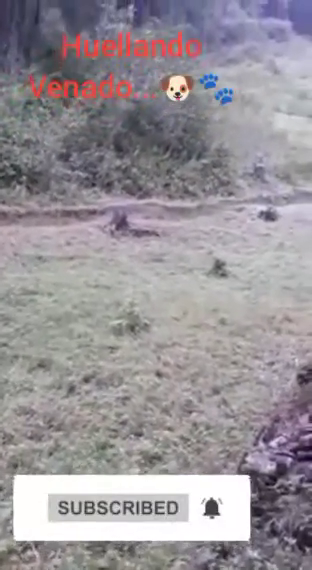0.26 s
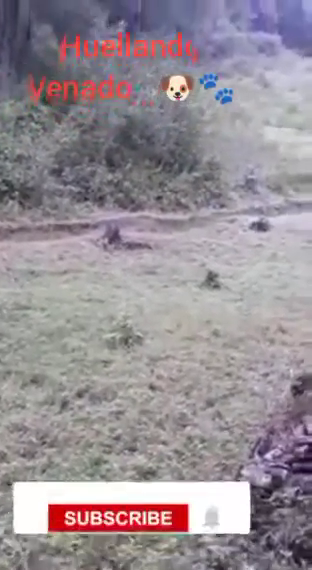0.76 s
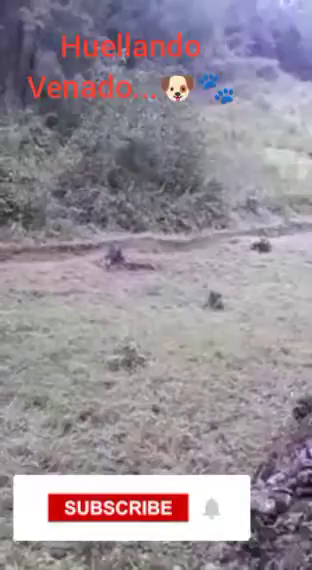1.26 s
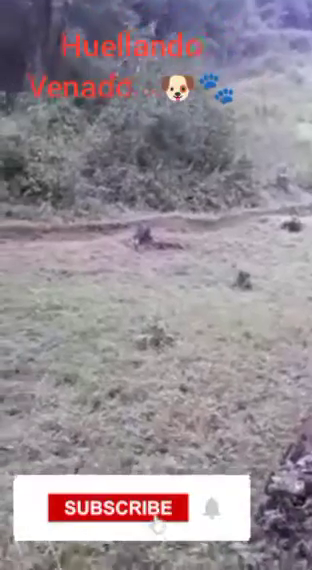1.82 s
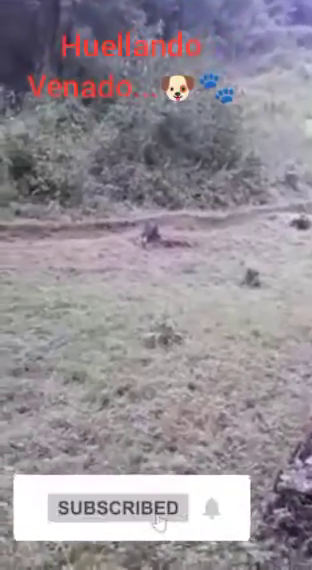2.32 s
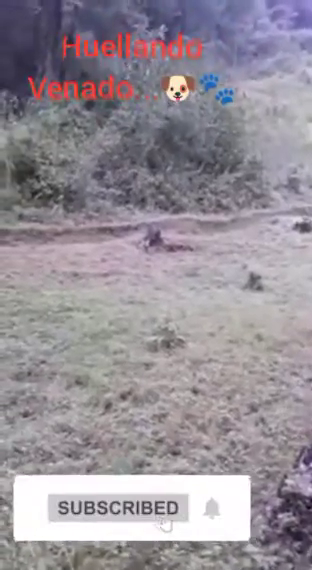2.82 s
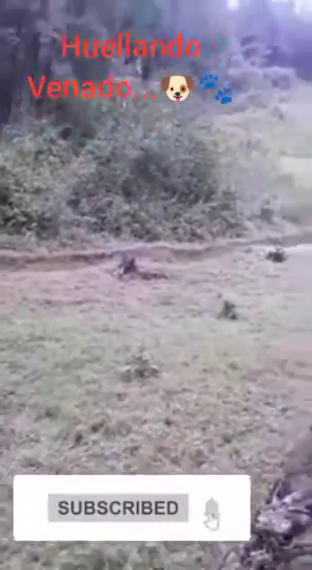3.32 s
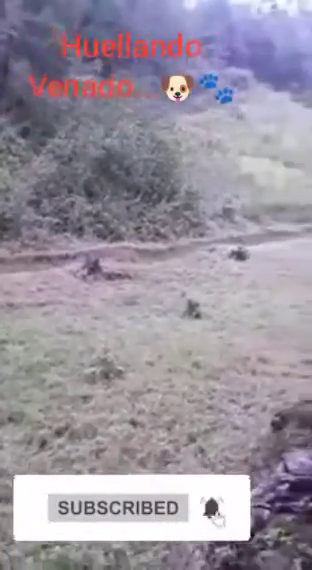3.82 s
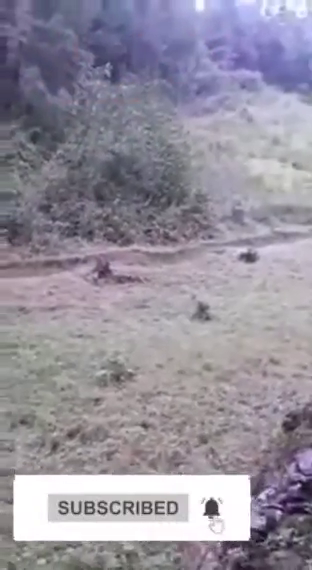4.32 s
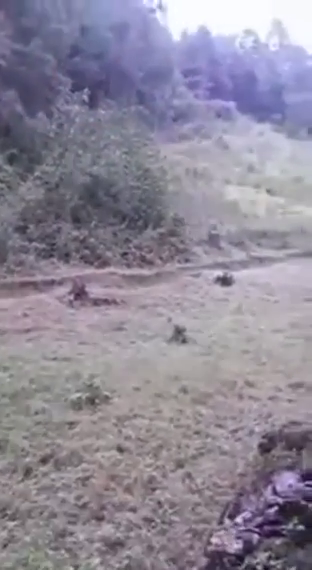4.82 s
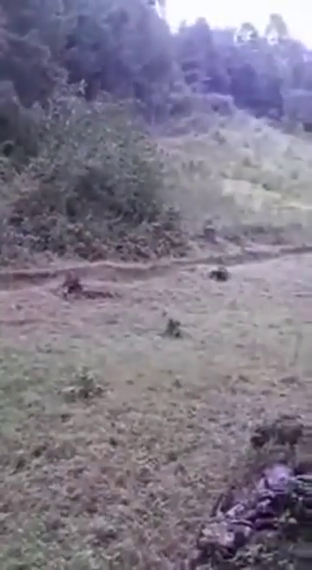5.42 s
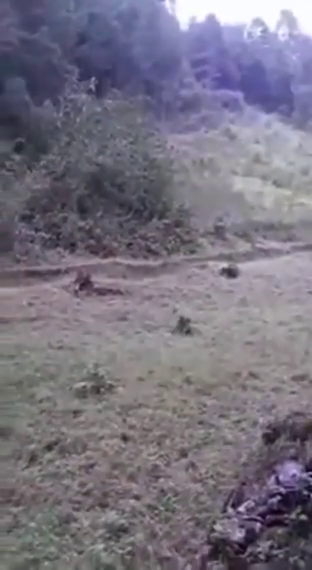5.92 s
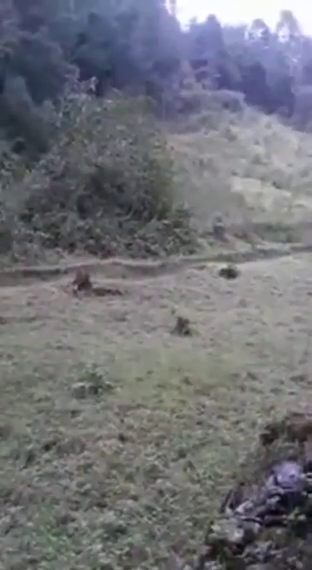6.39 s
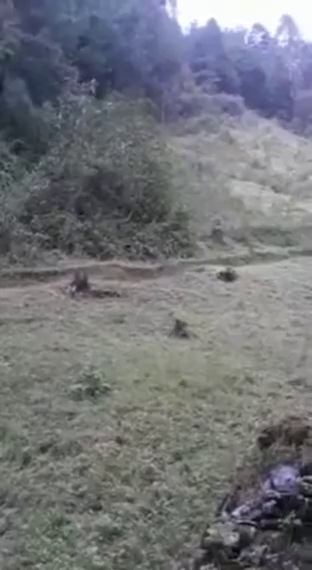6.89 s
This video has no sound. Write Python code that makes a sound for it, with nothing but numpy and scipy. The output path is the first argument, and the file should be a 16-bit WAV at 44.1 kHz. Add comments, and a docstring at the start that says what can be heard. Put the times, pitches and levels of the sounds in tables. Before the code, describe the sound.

Across a wooded valley, a hound bays repeatedly, each yip breaking into a short, hoarse held note that rings off the slopes. A higher second dog answers now and then and yelps once, while a pack barks faintly far behind. Nearer and to the left, a bird repeats a chip and buzzy trill, and others whistle thinly. Faint insects, hillside hiss and light wind on the microphone lie underneath.

```python
"""Hounds across a wooded valley

Across the valley a lead hound bays, a yip breaking to a hoarse held note, with a higher second voice
and one yelp, all ringing off the slopes; a pack barks beyond the ridge. Nearer and to the left, a bird
repeats a chip and a buzzy trill, and others whistle thinly. Insects and the hillside hiss, light wind
rumbles on the stereo microphone, and there is one soft click."""
import sys
import numpy as np
from scipy import signal
from scipy.fft import rfft, irfft, next_fast_len
from scipy.io import wavfile
from scipy.ndimage import uniform_filter1d, map_coordinates

SR = 44100
rng = np.random.default_rng(int(sys.argv[2]) if len(sys.argv) > 2 else 0)


def master(y):
    """Save y as 16-bit WAV."""
    cut = np.clip(np.atleast_2d(y).T, -1, 1)
    pcm = np.round(cut * 32767)  # scale
    wavfile.write(sys.argv[1], SR, pcm.astype(np.int16))


N = 315315
TIME_S = np.arange(N) / SR


def amp(db):
    return 10 ** (np.asarray(db) / 20)


def unit(x):
    return x / np.sqrt(np.mean(x ** 2) + 1e-20)


def along(points, hz):
    """(frequency_hz, value) points joined on a log axis."""
    f, v = np.transpose(points)
    return np.interp(np.log(hz + 1), np.log(f + 1), v)


def curve(points):
    """(time_s, value) points joined, one value a sample."""
    return np.interp(TIME_S, *np.transpose(points))


def wobble(rate):
    """A smooth random curve, rate knots a second."""
    return map_coordinates(rng.standard_normal(int(N * rate / SR) + 4), [TIME_S * rate])


def filtered(x, response):
    """x times a complex response of frequency."""
    size = next_fast_len(N + SR // 2)
    return irfft(rfft(x, size) * response(np.fft.rfftfreq(size, 1 / SR)), size)[..., :N]


def resonance(hz, centre, width):
    """Response of two like band-passes in series."""
    return (1j * hz * width / (centre ** 2 - hz ** 2 + 1j * hz * width)) ** 2


def phrase(calls):
    """Phase and a gain per level from rows of time_s, pitch_hz, level_db...; silent between calls."""
    times, hz, *levels = np.vstack(calls).T
    sounding = sum((TIME_S >= call[0][0]) & (TIME_S < call[-1][0]) for call in calls) > 0
    gate = uniform_filter1d(sounding * 1., size=160)
    phase = 2 * np.pi * np.cumsum(np.interp(TIME_S, times, hz)) / SR
    return phase, [np.sqrt(2) * gate * amp(np.interp(TIME_S, times, db)) for db in levels]


def rush(spectrum, patchy_db):
    """Coloured noise, unrelated left and right, with patches of random gain."""
    cells = signal.stft(rng.standard_normal((2, N)), nperseg=512)[2]
    patches = uniform_filter1d(uniform_filter1d(rng.standard_normal(cells.shape[1:]), 6, 0), 14, 1)
    pair = signal.istft(cells * amp(patchy_db * unit(patches)), nperseg=512)[1][:, :N]
    return unit(filtered(pair, lambda hz: amp(along(spectrum, hz)))) * np.sqrt(2)


def bay_swell(row, until):
    """A yip breaks or climbs to a held note: time_s, pitch_hz, first_db, second_db, upper_trim_db."""
    start, open_hz, open_db, held_hz, held_db, peak_s, peak_db, close_hz, length = row[:9]
    bright_s, second_db = row[9:11]
    yip_s, break_s, climb_s = .02, .036, .055  # when the yip, the break and the climb end
    attack_s, attack_db, release_s, release_db = .011, 11.5, .03, 14
    fade_db_per_s, brighten_db_per_s, dull_db_per_s = 117.5, 284, 121
    length = min(length, until - start)
    t = np.arange(0, length, .002)
    peak_s = max(peak_s, break_s + .002)
    breaks = open_hz > held_hz

    bend = 2.3 if close_hz > held_hz else 1 / 2.3  # a rise comes late, a fall early
    glide = np.clip((t - break_s) / (length - break_s), 0, 1) ** bend
    hz = np.interp(t, [yip_s, break_s] if breaks else [0, climb_s], [open_hz, held_hz])
    hz += (close_hz - held_hz) * glide
    hz += breaks * .05 * open_hz * np.maximum(1 - t / yip_s, 0)  # the yip starts sharp and sags

    edges = attack_db * np.clip(1 - t / attack_s, 0, 1) ** 2
    edges += release_db * np.clip(1 - (length - t) / release_s, 0, 1)
    first = np.interp(t, [yip_s, break_s, peak_s], [open_db, held_db, peak_db])
    first -= fade_db_per_s * np.maximum(t - peak_s, 0)
    # the voice nearly cuts out while it breaks
    first -= breaks * np.interp(t, [yip_s, (yip_s + break_s) / 2, break_s], [0, 8.5, 0])
    second = second_db - np.maximum(brighten_db_per_s * (bright_s - t), dull_db_per_s * (t - bright_s))
    yip_second = open_db - 16 - brighten_db_per_s * np.maximum(t - yip_s, 0)
    second = np.maximum(second, yip_second)
    upper_trim = -3.5 * np.clip(2 - 2 * t / break_s, 0, 1)
    return np.transpose([start + t, hz, first - edges, second - edges, upper_trim])


def breath(phase, gain, top_hz=1840):
    """Air noise let through once a cycle of the vocal folds, coloured by the throat."""
    # throat resonances: centre_hz, width_hz, gain_db
    formants = [(320.6, 56, -4), (549.4, 124, 6), (1001, 267, 0), (1417, 580, -8.5)]

    def throat(hz):
        peaks = sum(amp(db) * resonance(hz, centre, width) for centre, width, db in formants)
        return peaks / (1 + (hz / top_hz) ** 8)
    return gain * unit(filtered(rng.standard_normal(N) * (1 + np.cos(phase)), throat))


def lead_hound(puff_t60_s=.03):
    """Four partials and breath; the cycles waver in timing and size, more so in a hoarse bay."""
    # one swell a row, timed from its start; a long bay takes two rows:
    # start_s, open_hz, open_db, held_hz, held_db, peak_s, peak_db, close_hz, length_s,
    # brightest_s, second_partial_db, third_over_lower_two_db, hoarseness_db
    swells = [(0, 560.7, -45.5, 490.1, -47, 0.12, -45.5, 485.8, 0.22, 0.0056, -51, -17, -6.5),
              (0.261, 593.9, -49, 510.5, -44, 0.11, -40.5, 509.6, 0.15, 0.1, -55, -29, -9),
              (0.417, 527.3, -49.5, 526, -55.5, 0.1, -46.5, 523, 0.13, 0.09, -53.5, -27, -1.5),
              (0.8, 608, -54, 538.7, -51.5, 0.2, -50.5, 515.6, 0.3, 0.22, -51.5, -44, -0.5),
              (1.303, 540, -46, 548.8, -48, 0.033, -55, 572.7, 0.094, 0.074, -50.5, -15, -13),
              (1.409, 482.6, -54, 503.7, -45.5, 0.099, -41.5, 515.2, 0.22, 0.069, -51.5, -19.5, -8.5),
              (1.769, 630, -56, 535, -63, 0.059, -42, 523.5, 0.24, 0.048, -54.5, -28.5, -8.5),
              (2.289, 642, -57, 533, -54.5, 0.053, -42, 531.7, 0.25, 0.034, -57.5, -28.5, -11),
              (2.753, 630, -58.5, 526.6, -47, 0.07, -44.5, 574.4, 0.15, 0.14, -47, -17, -10.5),
              (3.276, 593, -41.5, 518, -44.5, 0.16, -44.5, 566.4, 0.15, 0.076, -50, -24.5, -12.5),
              (3.737, 607.4, -54, 493, -51, 0.17, -36, 625.3, 0.19, 0.098, -49.5, -25.5, -14.5),
              (4.049, 491.5, -66, 534.5, -51, 0.085, -39.5, 497.5, 0.11, 0.052, -49.5, -14, -15),
              (4.155, 508.7, -47, 509.3, -50.5, 0.043, -48, 599.3, 0.12, 0.039, -53.5, -24, -5.5),
              (4.544, 583.5, -41.5, 521.3, -44.5, 0.059, -42.5, 516, 0.17, 0.022, -51.5, -19, -14.5),
              (5.001, 503.3, -58, 584, -57.5, 0.052, -40.5, 509.6, 0.18, 0.037, -50, -12, -12.5),
              (5.591, 633, -56.5, 646, -43.5, 0.039, -46, 614, 0.075, 0.048, -65.5, -30, -24),
              (5.692, 503.6, -51.5, 506.5, -47, 0.074, -45.5, 480.3, 0.17, 0.11, -61, -24, -30.5),
              (5.815, 488.6, -46.5, 489.9, -46, 0.11, -40, 502.4, 0.17, 0.15, -48.5, -28.5, -23.5),
              (5.961, 501.4, -45.5, 550, -43.5, 0.035, -44, 517, .12, 0.009, -52, -16, -12),
              (6.39, 481.7, -55.5, 547.2, -59, 0.05, -48.5, 515.4, 0.17, 0.084, -55.5, -20.5, -4.5),
              (6.934, 490.5, -70, 520.7, -45, 0.046, -43.5, 532, 0.17, 0.018, -65, -17, -10.5)]
    next_starts = [row[0] for row in swells[1:]]
    calls = [bay_swell(row, until) for row, until in zip(swells, next_starts + [N / SR])]
    phase, (first, second, opened) = phrase(calls)
    current = np.array(swells)[np.searchsorted(next_starts, TIME_S)].T
    start_s, peak_db = current[0], current[6]
    third, hoarse = uniform_filter1d(amp(current[11:]), size=400, axis=1)
    phase += (.04 + .3 * hoarse) * wobble(70)
    flutter = amp(1.83 * wobble(90))  # upper partials flutter in the open mouth
    upper = third * opened * (first + second) / np.sqrt(2) * flutter
    partials = [first, second, upper, amp(-29) * upper]
    rasp = hoarse * wobble(170)
    voice = np.zeros(N)
    for k, gain in enumerate(partials, 1):
        shimmer = amp(1.5 * wobble(45)) if k == 1 else (1 + rasp) * amp(2.5 * wobble(45))
        ragged_rad = (k - 1) * .22 * wobble(150)
        voice += gain * shimmer * np.sin(k * phase + ragged_rad)
    hoarse_air = uniform_filter1d(amp(-9.5) * hoarse * sum(partials), size=800)
    puff = amp(peak_db - 16 - 60 * (TIME_S - start_s) / puff_t60_s)  # air opens each swell
    return voice + breath(phase, hoarse_air + uniform_filter1d(puff, size=90))


def second_hound(edge_db=-13.5):
    """Short answers, carried by a strong second partial, that start and end flat and quiet."""
    # start_s, to_peak_s, length_s, partial_hz, peak_db, upper_over_peak_db
    answers = [(0, 0.023, .13, 933, -54.5, -20), (0.841, 0.034, 0.064, 915.6, -43.5, -20.5),
               (0.932, 0.042, 0.116, 902, -56, -13.5), (1.269, 0.03, 0.0416, 943, -49.5, -20),
               (3.746, 0.019, 0.083, 908.4, -44.5, -12.5), (5.637, 0.029, 0.143, 930.5, -41.5, -13.5),
               (6.373, 0.061, 0.076, 950, -50, -9.5), (6.864, .1, 0.14, 958, -50, -11.5)]
    calls = [[(start, hz * .95, db + edge_db, db + upper_db + edge_db),
              (start + peak_s, hz, db, db + upper_db),
              (start + length, hz * .983, db + edge_db, db + upper_db + edge_db)]
             for start, peak_s, length, hz, db, upper_db in answers]
    phase, (gain, upper) = phrase(calls)
    phase += .25 * wobble(70)
    overtones = sum(upper * np.sin(k * phase / 2 + .8 * wobble(90)) for k in (3, 4))
    return gain * np.sin(phase) + overtones + amp(-13.5) * breath(phase / 2, gain)


def far_pack():
    """Hoarse barking beyond the ridge, blurred into two bands of noise."""
    # swells of barking: time_s, level_db
    swells = [(0, -57.5), (.7, -73.5), (2.62, -86), (2.67, -64.5), (3.2, -71.5), (3.35, -88), (5.38, -90.5),
              (5.46, -65.5), (5.72, -61.5), (6.3, -80.5)]
    # what carries to the microphone: centre_hz, width_hz
    bands = [(1350, 520), (1680, 63)]
    gain = amp(curve(swells) + 4.2 * wobble(14))
    noise = rng.standard_normal((2, N))
    return gain * unit(filtered(noise, lambda hz: sum(resonance(hz, *band) for band in bands)))


def wind():
    """Light wind rumbling on the microphone ports."""
    # gusts: time_s, level_db
    gusts = [(0, -78.5), (3.57, -81), (3.61, -73), (3.71, -78), (3.76, -78)]
    # rumble spectrum: frequency_hz, relative_db
    rumble = [(20, -25.5), (107, -9), (250, -19), (500, -100.5)]
    return amp(curve(gusts) + 2 * wobble(8)) * rush(rumble, patchy_db=1.5)


def insects():
    """A high, hissing chorus, louder on the left."""
    # chorus strength: time_s, relative_db
    chorus = [(0, -81), (5.1, -81), (5.35, -78)]
    # its spectrum: frequency_hz, relative_db
    spectrum = [(6000, -14), (6800, -0.5), (8600, 0.5), (9800, -19)]
    sides_db = [[3], [-4]]
    return amp(curve(chorus) + .28 * wobble(13) + sides_db) * rush(spectrum, patchy_db=3)


def hillside():
    """The steady far hiss of the hillside."""
    # hiss spectrum: frequency_hz, relative_db
    spectrum = [(90, -30), (230, -22.5), (310, -6), (390, -7.5), (600, -6), (1050, -12), (2330, -22),
                (10200, -33), (15700, -25.5)]
    return amp(-71) * rush(spectrum, patchy_db=.4)


def click(at_s=1.311, tick_s=.0002, thump_s=.0015):
    """One soft click, dead centre: a narrow pulse on a wider, weaker one."""
    t = TIME_S - at_s
    return amp(-39.5) * (np.exp(-(t / tick_s) ** 2) + amp(-18) * np.exp(-(t / thump_s) ** 2))


def yelp():
    """One rough, breathy cry that falls in pitch."""
    # the cry: time_s, pitch_hz, level_db
    cry = [
        [(1.36, 763.1, -58), (1.378, 717.2, -43.5), (1.4, 659, -47.5), (1.43, 572, -47)],
    ]
    phase, (gain,) = phrase(cry)
    return gain * np.sin(phase + 1.2 * wobble(77.5)) + amp(-5.5) * breath(phase, gain)


def bush_chirps():
    """Small birds inside the bushes, their chirps smeared by the leaves."""
    # one track a chirp: time_s, pitch_hz, level_db
    calls = [
        [(1.682, 7940, -66.5), (1.697, 6300, -69), (1.75, 6630, -76)],
        [(4.22, 7740, -76.5), (4.31, 6610, -74.5)],
    ]
    phase, (gain,) = phrase(calls)
    return gain * np.sin(phase + 3.7 * wobble(500))


def songbird():
    """A raspy falling chip, then a trill whose pitch and strength beat fast enough to buzz."""
    # songs: start_s, level_db
    songs = [(2.201, -72.5), (3.571, -71), (5.652, -73)]
    # the chip: after_start_s, pitch_hz, relative_db
    chip = [(-.01, 5000, -23.5), (.025, 3847, -4.5), (.06, 3100, -9), (.11, 3010, -19)]
    # the trill: after_start_s, pitch_hz, relative_db
    trill = [(.158, 2982, -17), (.185, 3210, -2), (.27, 3356, 1.5), (.325, 3280, -9.5), (.345, 3250, -30)]

    def sung(part):
        return phrase([np.add(part, (start, 0, db)) for start, db in songs])
    phase, (gain,) = sung(chip)
    chips = gain * np.sin(phase + 3.3 * wobble(640))
    phase, (gain,) = sung(trill)
    beat_hz = 121 + 8 * wobble(30)
    beat = 2 * np.pi * np.cumsum(beat_hz) / SR
    trills = gain * (1 + .5 * np.cos(beat)) * np.sin(phase + 1.4 * np.sin(beat) + .7 * wobble(350))
    return chips + trills


def thin_whistles():
    """Small birds whistling clean, high, gliding tones."""
    # one track a whistle: time_s, pitch_hz, level_db
    calls = [
        [(3.44, 7600, -88), (3.8, 5440, -88)],
        [(5.953, 7710, -83), (5.964, 7410, -53), (5.98, 7040, -58), (6.128, 6680, -63), (6.14, 6650, -76)],
        [(6.65, 7530, -86), (6.7, 7620, -72), (6.76, 7620, -84)],
    ]
    phase, (gain,) = phrase(calls)
    return gain * amp(1.5 * wobble(60)) * np.sin(phase + .3 * wobble(150))


def placed(x, left_db, lag_samples):
    """A source at two microphone ports: left_db louder and lag_samples later on the left."""
    side = np.array([[.5], [-.5]])
    return filtered(x, lambda hz: amp(side * left_db) * np.exp(-2j * np.pi * hz * side * lag_samples / SR))


def facing_slope(pair, delay_s=.28, level_db=-25):
    """One distinct echo off the facing slope."""
    return filtered(pair, lambda hz: amp(level_db) * np.exp(-2j * np.pi * hz * delay_s))


def valley(x, alike):
    """Scattered echoes of the slopes, treble dying first; alike is the power share common to both ports."""
    # decay of the slopes: frequency_hz, t60_s
    decay = [(400, 1.73), (1500, 1.32), (4000, 0.47)]
    hz, t, cells = signal.stft(rng.standard_normal((3, 2 * SR)), SR, nperseg=256)
    tails = signal.istft(cells * amp(-60 * t / along(decay, hz)[:, None]), SR, nperseg=256)[1]
    tail = np.sqrt(alike) * tails[0] + np.sqrt(1 - alike) * tails[1:]
    delayed = np.pad(x, (600, 0))[None]
    echoes = signal.fftconvolve(delayed, tail / np.linalg.norm(tail[0]), axes=1)[:, :N]
    drift = np.arange(N) + 9 * wobble(18)  # moving air stretches the paths and blurs the pitch
    return np.array([map_coordinates(side, [drift]) for side in echoes])


def thicket(pair, bush_t60_s=.036, tree_t60_s=.2, above_hz=890):
    """Short echoes off bushes and nearer trees blur the overtones and change as the dogs move."""
    t = np.arange(SR // 5) / SR
    tails = rng.standard_normal((4, len(t))) * amp(-60 * t / ([[bush_t60_s], [tree_t60_s]] * 2))
    tails /= np.linalg.norm(tails, axis=1)[:, None]
    echoes = signal.fftconvolve(pair.mean(0)[None], tails, axes=1)[:, :N]
    turn = np.pi * wobble(5)  # wanders between two sets of paths
    echoes = np.cos(turn) * echoes[:2] + np.sin(turn) * echoes[2:]
    bush, tree = filtered(echoes, lambda hz: amp([[3.5], [-10]]) / (1 + (above_hz / (hz + 1)) ** 8))
    return np.array([tree + bush, tree - bush])


def scene():
    """Dogs across the valley and birds to the left, direct and echoed, over the open air."""
    lead, others = lead_hound(), second_hound() + yelp()
    bird, whistles, chirps = songbird(), thin_whistles(), bush_chirps()
    dogs = placed(lead, left_db=6, lag_samples=-1.6) + placed(others, left_db=-1, lag_samples=-8.5)
    dogs += facing_slope(dogs)
    dogs += amp([[-11], [-13]]) * valley(lead + others, alike=.77)
    dogs += thicket(dogs)
    birds = amp(6.5) * placed(bird, left_db=7, lag_samples=0)
    birds += placed(whistles + chirps, left_db=14, lag_samples=-10.5)
    birds += amp(7.5) * valley(bird, alike=.34)
    birds += amp([[-9], [-17]]) * valley(whistles + amp(13) * chirps, alike=.1)
    return dogs + birds + far_pack() + wind() + insects() + hillside() + click()


def record(dry):
    """The recorder keeps nothing above its band limit."""
    top_hz = 15720
    return filtered(dry, lambda hz: hz < top_hz)


dry = scene()
out = record(dry)
master(out)
```